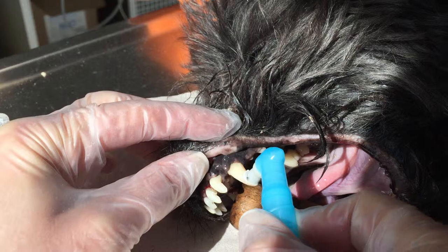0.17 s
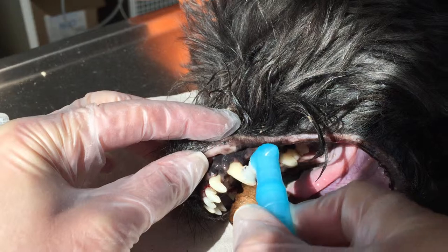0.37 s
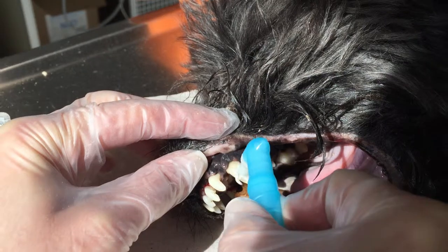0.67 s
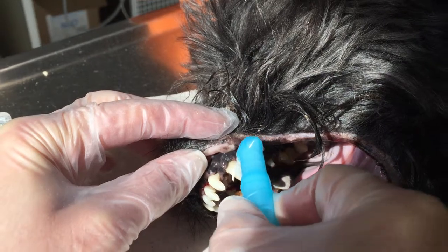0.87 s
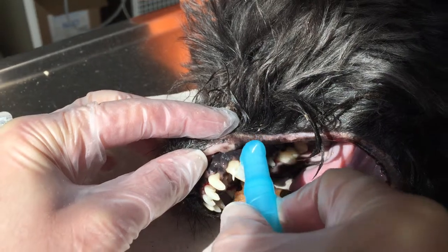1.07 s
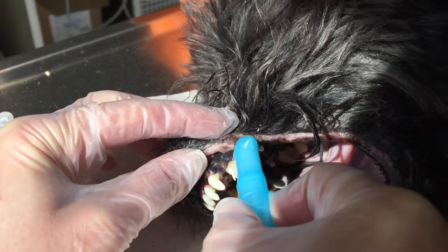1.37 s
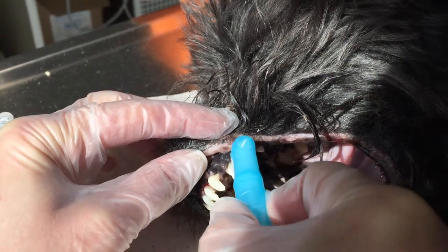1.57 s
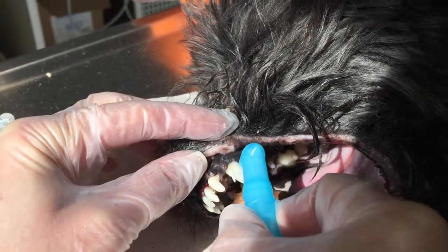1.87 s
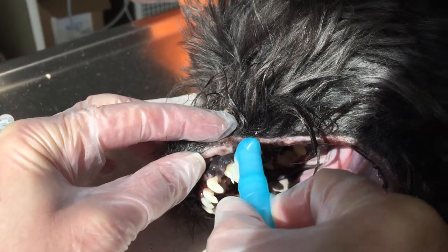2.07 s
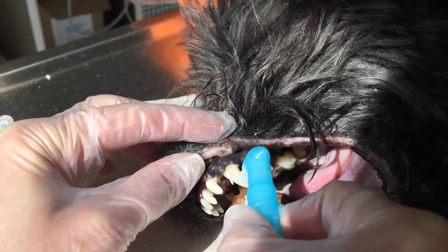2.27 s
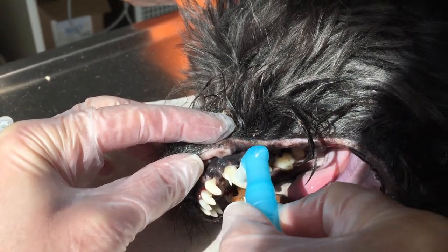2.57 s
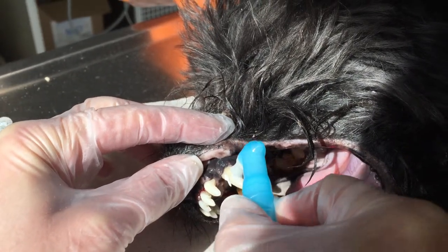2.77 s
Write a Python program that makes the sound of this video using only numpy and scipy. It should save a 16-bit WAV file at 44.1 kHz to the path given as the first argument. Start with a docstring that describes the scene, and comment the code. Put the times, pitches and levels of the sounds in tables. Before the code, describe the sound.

Close up in a faintly humming room, an electric toothbrush buzzes freely for a moment before pressing onto an animal's teeth. The buzz turns into rapid plastic clacking and whirring, with high bristle squeaks that come and go.

```python
"""A rattling buzz: an oscillating electric toothbrush runs free, close to the microphone.
It then slows against an animal's teeth. The head clacks at both ends of each swing, the hollow handle
knocks, the gears whir, and the bristles scrape, then stick and slip on enamel in squeaks.
A faint room hum lies below."""
import sys
import numpy as np
from scipy import signal
from scipy.fft import rfft, irfft, next_fast_len
from scipy.io import wavfile
from scipy.ndimage import map_coordinates

SR = 44100
rng = np.random.default_rng(int(sys.argv[2]) if len(sys.argv) > 2 else 0)


def dump(signal):
    """Clip the signal to [-1, 1] and save it as 16-bit WAV at the path in sys.argv[1]."""
    limited = np.clip(np.atleast_2d(signal).T, -1, 1)
    pcm = np.round(limited * 32767).astype(np.int16)
    wavfile.write(sys.argv[1], SR, pcm)


N = 128772
TIME_S = np.arange(N) / SR
START_S, FIRST_SWING_S = .12, .1316
MAX_SWINGS, ROW_SAMPLES = 200, 1024  # one row of sound per swing

# motor speed (time [s], swing rate [Hz])
SWING_HZ = [(.12, 49.997), (.4, 48.735), (.68, 48.78), (.88, 47.372), (1.05, 46.721), (1.22, 45.728),
            (1.5, 46.418), (1.75, 46.413), (1.9, 47.124), (2.13, 46.816), (2.29, 48.23), (2.4, 46.404),
            (2.6, 46.136), (2.92, 45.329)]
# rattle of the unloaded head (time [s], level [dB])
RATTLE_DB = [(.12, -36), (.18, -34), (.3, -36.5), (.42, -48), (.6, -103), (.9, -73)]
# spectrum of its buzz (frequency [Hz], gain [dB])
RATTLE_BODY = [(600, -29.5), (800, -26), (950, -5), (1300, -8.5), (1700, 3.5), (1900, -2), (2400, 4.5),
               (3000, -10), (4000, -9.5), (5000, -25), (15000, -39)]
# gear whir (time [s], level [dB])
GEAR_DB = [(.12, -41.5), (.55, -37), (1, -41), (1.9, -42.5), (2.3, -41), (2.6, -39.5), (2.92, -40)]
# gear spectrum (frequency [Hz], gain [dB])
GEAR_BODY = [(300, -20.5), (700, -20.5), (1000, -7), (1500, -0.5), (1850, 1), (2200, 0), (3200, 2.5),
             (4000, -3.5), (5000, -7), (6000, -1.5), (7000, 0), (8800, -5), (9900, -6), (10600, -13),
             (12200, -10), (15000, -8)]
# ventilation spectrum (frequency [Hz], gain [dB])
VENT_SPECTRUM = [(25, -12), (48, -2), (70, -11), (90, -20), (200, -5), (320, 0), (450, -9.5), (800, -12),
                 (4000, -21.5)]
# room equipment tones (frequency [Hz], level [dB])
HUM_TONES = [(48.4, -84), (68.8, -78), (305.5, -77.5)]
# clack ending the forward swing (time [s], level [dB])
FORWARD_CLACK_DB = [(.13, -64), (.48, -50), (.6, -49), (.76, -36.5), (.87, -43), (.91, -36), (.96, -45.5),
                    (1.06, -37.5), (1.28, -36.5), (1.33, -32.5), (1.44, -33.5), (1.47, -35.5),
                    (1.65, -37.5), (2.01, -37), (2.05, -32), (2.12, -26.5), (2.28, -36), (2.42, -29.5),
                    (2.46, -32), (2.72, -31.5), (2.8, -35.5)]
# its spectrum (frequency [Hz], gain [dB])
FORWARD_BODY = [(600, -44.5), (900, -33.5), (1200, -8), (1800, -8.5), (2400, -6), (4300, -3), (4900, -7),
                (6900, 3.5), (7900, 2.5), (8600, -5), (9800, 2.5), (10500, -6.5), (15000, -9.5)]
# clack ending the return swing (time [s], level [dB])
RETURN_CLACK_DB = [(.13, -46), (.49, -43), (1.1, -39), (1.22, -38), (1.31, -43), (1.6, -37.5), (1.7, -39.5),
                   (2.3, -39.5), (2.42, -36.5), (2.6, -35.5), (2.9, -34.5)]
# its spectrum (frequency [Hz], gain [dB])
RETURN_BODY = [(600, -41.5), (1300, -29.5), (2250, 2.5), (2900, -3), (3400, -4.5), (5000, -2.5), (6000, -7),
               (6750, 9), (7300, -1), (8300, -1), (8900, -4.5), (11300, -8.5), (12500, -1.5), (13400, -18),
               (15000, -21)]
# hollow around the brush (time [s], resonance [Hz])
MOUTH_HZ = [(.4, 2920), (.9, 3450), (1.3, 3280), (1.43, 3800), (1.64, 2850), (1.7, 3600), (2.12, 2850),
            (2.41, 3480), (2.46, 2470), (2.92, 2970)]
# harder hits on a tooth's edge (time [s], boost [dB])
CATCH_DB = [(1.645, 7), (1.689, 6.5), (1.732, 3.5), (1.861, 8), (2.823, 4)]
# handle knock (time [s], level [dB])
KNOCK_DB = [(.13, -65), (.42, -49), (.58, -55), (.74, -46), (.87, -62), (1.06, -49), (1.23, -61.5),
            (1.33, -45.5), (1.5, -54.5), (1.86, -52), (1.98, -60), (2.1, -41.5), (2.28, -51.5), (2.41, -45),
            (2.89, -47)]
# softer knock as the handle springs back (time [s], level [dB])
REBOUND_DB = [(.3, -68), (1, -53), (2.2, -54.5), (2.4, -57)]
# dry bristle scrape (time [s], level [dB])
SCRAPE_DB = [(.35, -52), (.48, -40.5), (.57, -50), (.7, -39.5), (1, -48), (1.9, -50), (2.3, -40),
             (2.9, -52)]
# its spectrum (frequency [Hz], gain [dB])
SCRAPE_BODY = [(900, -56), (2300, 1.5), (3600, -7), (7000, -43.5)]
# squeak on the forward sweep (time [s], level [dB])
FORWARD_SQUEAK_DB = [(.12, -75), (.8, -43), (1.05, -48), (2.48, -46), (2.57, -29.5), (2.65, -43),
                     (2.87, -35)]
# squeak on the return sweep (time [s], level [dB])
RETURN_SQUEAK_DB = [(.85, -54), (1.08, -43.5), (1.13, -35.5), (1.22, -26), (1.27, -30), (1.31, -42),
                    (1.37, -35), (1.46, -40.5), (1.55, -32), (1.66, -26), (1.71, -39.5), (1.77, -32),
                    (1.85, -29.5), (1.88, -48), (1.97, -37), (2.02, -50), (2.44, -53), (2.58, -33.5),
                    (2.66, -43), (2.77, -27.5), (2.9, -28)]
# pitch at each squeak's peak (time [s], frequency [Hz])
SQUEAK_HZ = [(1.15, 5990), (1.65, 5927), (2.6, 5920), (2.9, 5920)]


def amp(db):
    """Decibels to gain."""
    return 10 ** (np.asarray(db) / 20)


def unit(x):
    """Scale to rms 1."""
    return x / np.sqrt(np.mean(x ** 2) + 1e-20)


def at(points, time_s=TIME_S):
    """Curve value at the given times."""
    return np.interp(time_s, *np.transpose(points))


def wobble(rate_hz):
    """Smooth random curve."""
    return map_coordinates(rng.standard_normal(400), [TIME_S * rate_hz], mode="wrap")


def colour(x, spectrum):
    """Minimum-phase filter; output rms 1."""
    size = 2 * next_fast_len(N)
    hz, db = np.transpose(spectrum)
    gain = amp(np.interp(np.log(np.fft.rfftfreq(size, 1 / SR) + 1), np.log(hz), db))
    cepstrum = irfft(np.log(gain))
    cepstrum[1:size // 2] *= 2
    cepstrum[size // 2 + 1:] = 0
    return unit(irfft(rfft(x, size) * np.exp(rfft(cepstrum)))[:N])


def flatten(rows):
    """Partly whiten each row: the changing contact colours it only a little."""
    spectra = rfft(rows)
    return unit(irfft(spectra / np.sqrt(np.abs(spectra) + 1e-20)))


def swing_count():
    """Swings since FIRST_SWING_S, per sample."""
    count = np.cumsum(at(SWING_HZ)) / SR
    return count - np.interp(FIRST_SWING_S, TIME_S, count)


def swing_times(turn):
    """Times [s] at which the head passes the fraction `turn` of its cycle."""
    count = swing_count()
    return np.interp(np.arange(-2, int(count[-1] - turn) + 1) + turn, count, TIME_S)


def place(starts_s, rows, scatter_db, jitter_s=.00004):
    """One row at each start, scattered in time and level."""
    late_s = jitter_s * rng.standard_normal(MAX_SWINGS)[:len(starts_s)]
    index = np.round((starts_s + late_s) * SR).astype(int)[:, None] + np.arange(ROW_SAMPLES)
    gain = amp(scatter_db * rng.standard_normal(MAX_SWINGS))[:len(starts_s), None]
    return np.bincount(np.clip(index, 0, N).ravel(), (rows * gain).ravel(), N + 1)[:N]


def swing_noise(count, fresh, drift):
    """Noise rows that repeat with drift; `fresh` is the power share drawn anew each swing."""
    slow, new = rng.standard_normal((2, MAX_SWINGS, ROW_SAMPLES))
    keep = 1 - drift
    slow = signal.lfilter([np.sqrt(1 - keep ** 2)], [1, -keep], slow[1:], axis=0, zi=keep * slow[:1])[0]
    return np.sqrt(1 - fresh) * slow[:count] + np.sqrt(fresh) * new[:count]


def free_rattle():
    """Until pressed down, the head buzzes and slaps once a swing in its play."""
    slap = clacks(.14, FORWARD_BODY, snap=.34, rise_s=.0001, decay_s=.00054, scatter_db=3.5)
    buzz = gear_buzz(RATTLE_BODY, fresh=.22, ripple_db=7.5, turn=.033)
    return amp(at(RATTLE_DB)) * (buzz + amp(-6.5) * slap)


def gear_buzz(body, fresh, ripple_db, turn):
    """Gear noise repeats every swing and swells four times in it."""
    starts_s = swing_times(0)
    rows = flatten(swing_noise(len(starts_s), fresh, drift=.032))
    ripple = amp(ripple_db * np.cos(2 * np.pi * 4 * (swing_count() - turn)))
    return colour(place(starts_s, rows, scatter_db=1.5) * ripple, body)


def room(vent_db=-73.5):
    """Equipment hum and faint ventilation."""
    hum = sum(np.sqrt(2) * amp(db) * np.sin(2 * np.pi * hz * TIME_S + .5 * wobble(6.04))
              for hz, db in HUM_TONES)
    return hum + amp(vent_db) * colour(rng.standard_normal(N), VENT_SPECTRUM)


def clacks(turn, body, snap, rise_s, decay_s, scatter_db, mouth_db=-4, clatter_s=.0046):
    """One plastic clack a swing: brief scrape, snap, dying clatter."""
    hits_s = swing_times(turn)
    t = (np.arange(ROW_SAMPLES) - 128) / SR
    before_s, after_s = np.minimum(t, 0), np.maximum(t, 0)
    clatter = amp(-17.5) * np.exp(-after_s / clatter_s)
    envelope = np.exp(before_s / rise_s) * (np.exp(-after_s / decay_s) + clatter)
    rows = flatten(envelope * swing_noise(len(hits_s), fresh=.35, drift=.17))
    rows *= np.exp(before_s / (2 * rise_s))  # keeps the attack sharp
    rows = rows / np.linalg.norm(rows, axis=1, keepdims=True) + snap * (t == 0)
    return colour(place(hits_s + t[0], mouth(rows, hits_s, mouth_db), scatter_db), body)


def mouth(rows, hits_s, boost_db, width_hz=550):
    """The hollow between lip and teeth rings, its pitch following the brush."""
    hz = np.fft.rfftfreq(ROW_SAMPLES, 1 / SR)
    centre_hz = at(MOUTH_HZ, hits_s)[:, None]
    resonance = 1j * hz * width_hz / (centre_hz ** 2 - hz ** 2 + 1j * hz * width_hz)
    rung = irfft(rfft(rows) * (1 + amp(boost_db) * resonance))
    return rung / np.linalg.norm(rung, axis=1, keepdims=True)


def head_clacks(catch_gain):
    """The head clacks at both turning points; catches harden the forward one."""
    forward = clacks(-.0021, FORWARD_BODY, snap=.35, rise_s=.00048, decay_s=.00066, scatter_db=2.03)
    back = clacks(.493, RETURN_BODY, snap=.65, rise_s=.00039, decay_s=.0019, scatter_db=1.6)
    return catch_gain * amp(at(FORWARD_CLACK_DB)) * forward + amp(at(RETURN_CLACK_DB)) * back


def handle_knock(turn, hz, width_s, glide_hz_per_s):
    """The hollow handle answers each swing with a short rounded note."""
    peaks_s = swing_times(turn)
    t = (np.arange(ROW_SAMPLES) - ROW_SAMPLES // 2) / SR
    note = np.exp(-(t / width_s) ** 2) * np.cos(2 * np.pi * (hz * t + glide_hz_per_s * t ** 2 / 2))
    return unit(place(peaks_s + t[0], np.tile(note, (len(peaks_s), 1)), scatter_db=1.5))


def bristles():
    """Bristles on teeth: a dry scrape once a swing, squeaks on both sweeps."""
    scrape = clacks(0, SCRAPE_BODY, snap=.3, rise_s=.00018, decay_s=.0013, scatter_db=3, mouth_db=36)
    back = squeak(.468, rise_s=.0019, fall_s=.0013, octave_db=-13.5, rasp_db=-8.5, scatter_db=2.5)
    forward = squeak(.78, rise_s=.00045, fall_s=.0033, octave_db=-31, rasp_db=3, scatter_db=4)
    return (amp(at(SCRAPE_DB)) * scrape + amp(at(RETURN_SQUEAK_DB)) * back
            + amp(at(FORWARD_SQUEAK_DB)) * forward)


def squeak(turn, rise_s, fall_s, octave_db, rasp_db, scatter_db, sag_hz_per_s=36000, slip_rad=.7):
    """Stick-slip on enamel: one rough, falling whistle a swing."""
    peaks_s = swing_times(turn)
    t = (np.arange(ROW_SAMPLES) - ROW_SAMPLES // 2) / SR
    envelope = np.where(t < 0, np.exp(1 - np.hypot(1, t / rise_s)), np.exp(-(t / fall_s) ** 2))
    hz = at(SQUEAK_HZ, peaks_s)[:, None]
    friction = swing_noise(len(peaks_s), fresh=.6, drift=.15)
    stutter = unit(signal.filtfilt(*signal.butter(2, 300, fs=SR), friction, padtype=None))
    phase = 2 * np.pi * (hz * t - sag_hz_per_s * t ** 2 / 2) + slip_rad * stutter
    rasp = np.gradient(amp(rasp_db) * swing_noise(len(peaks_s), fresh=.74, drift=.5), axis=1)
    octave = amp(octave_db) * np.sin(2 * phase)
    rows = envelope * (np.sin(phase) + envelope * (octave + rasp))
    return unit(place(peaks_s + t[0], rows, scatter_db))


def edge_catches(width_s=.009):
    """Gain for the swings that catch a tooth's edge."""
    return amp(sum(db * np.exp(-((TIME_S - time_s) / width_s) ** 2) for time_s, db in CATCH_DB))


def scene():
    """Brush over room, mono."""
    catch_gain = edge_catches()
    head = head_clacks(catch_gain)
    knock = amp(at(KNOCK_DB)) * handle_knock(-.032, hz=1157, width_s=.0022, glide_hz_per_s=27000)
    rebound = amp(at(REBOUND_DB)) * handle_knock(.34, hz=1151, width_s=.0018, glide_hz_per_s=12000)
    gears = amp(at(GEAR_DB)) * gear_buzz(GEAR_BODY, fresh=.45, ripple_db=3, turn=.0033)
    return (free_rattle() + gears + head + catch_gain * knock + rebound + bristles() + room())[None]


def record(dry):
    """Silence until START_S, then a fast fade-in; low-passed."""
    fade_s, top_hz, edge_hz = .001, 15400, 900
    gate = np.clip((TIME_S - START_S) / fade_s, 0, 1)
    size = 2 * next_fast_len(N)
    lowpass = np.clip((top_hz - np.fft.rfftfreq(size, 1 / SR)) / edge_hz + .5, 0, 1) ** 2
    return irfft(rfft(dry * gate, size) * lowpass, size)[:, :N]


dry = scene()
out = record(dry)
dump(out)
```